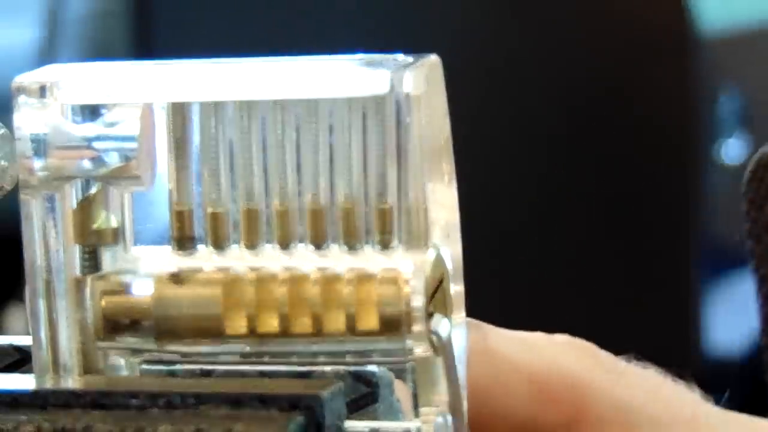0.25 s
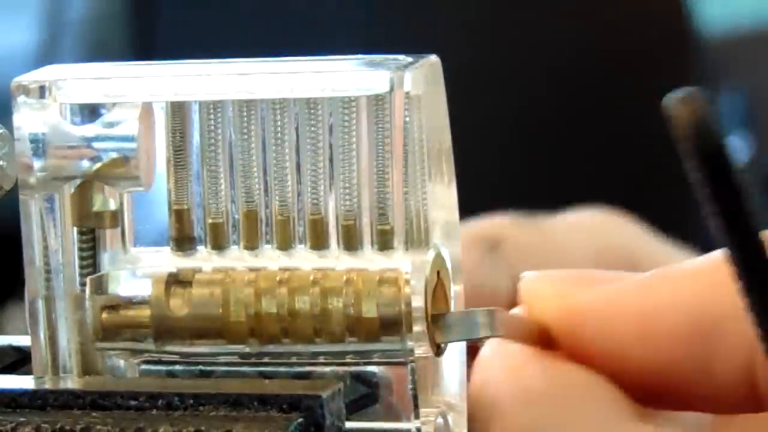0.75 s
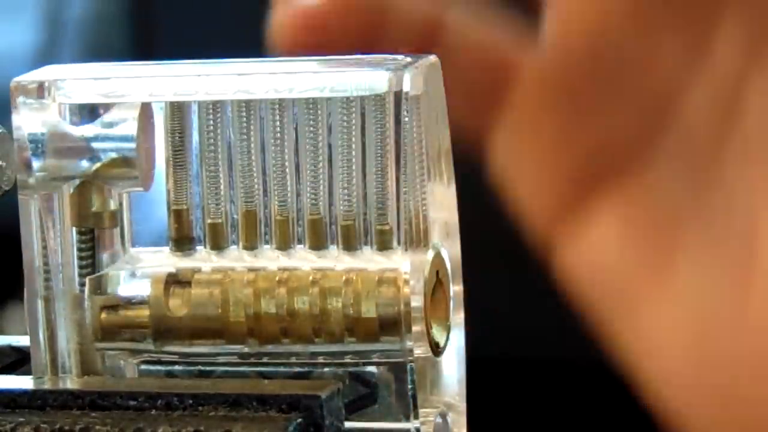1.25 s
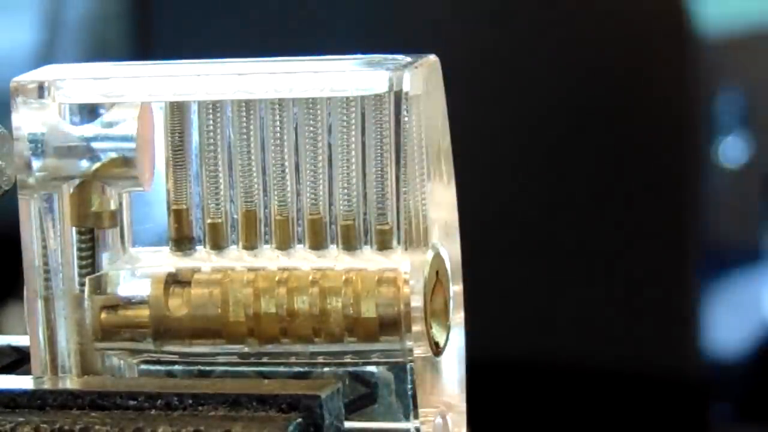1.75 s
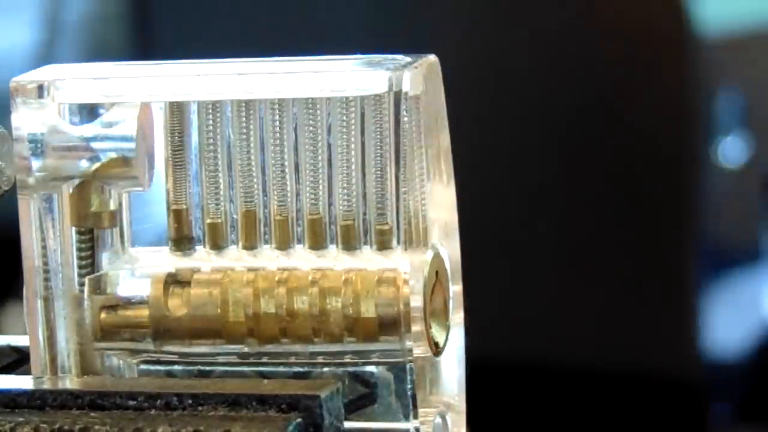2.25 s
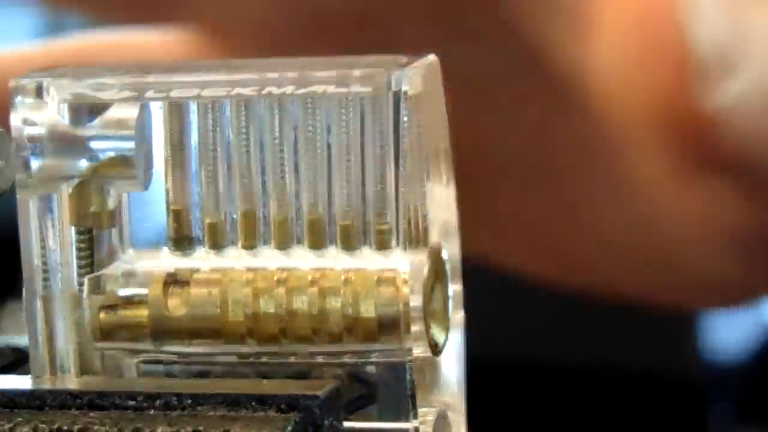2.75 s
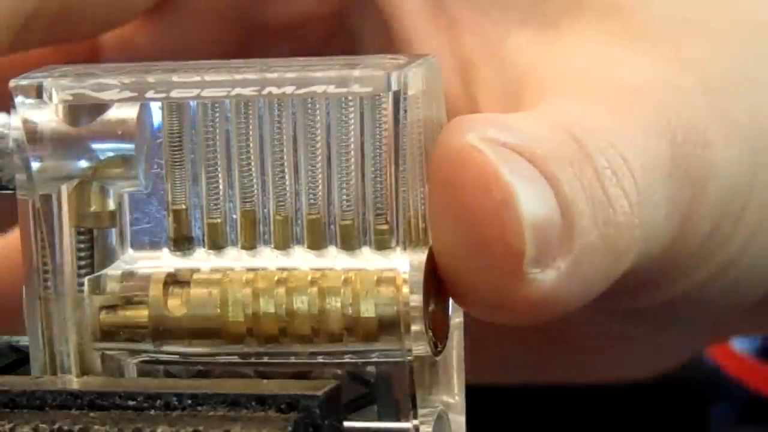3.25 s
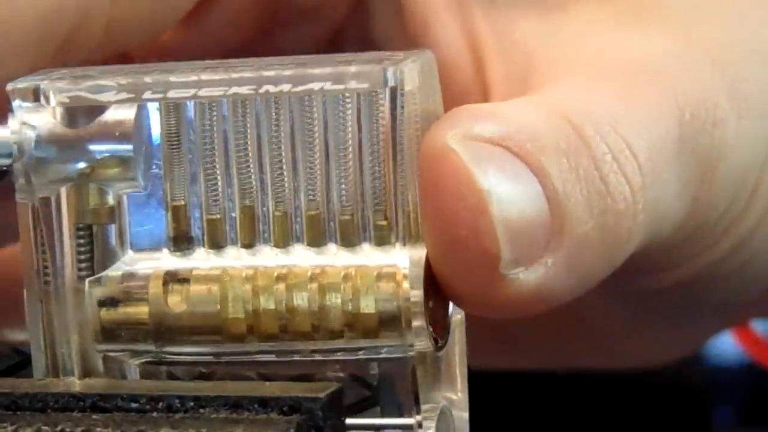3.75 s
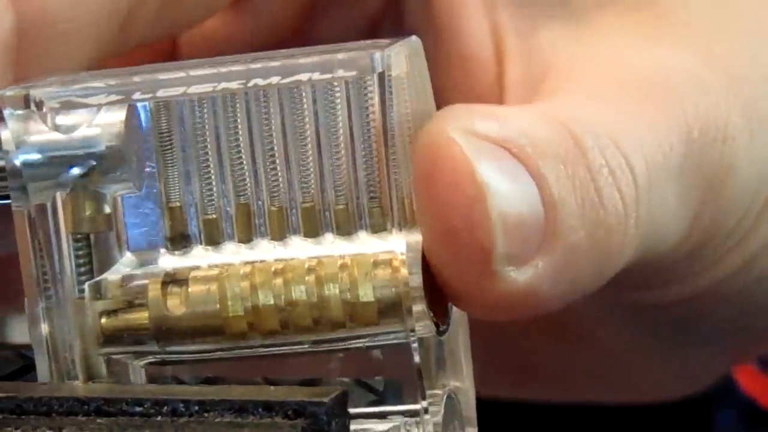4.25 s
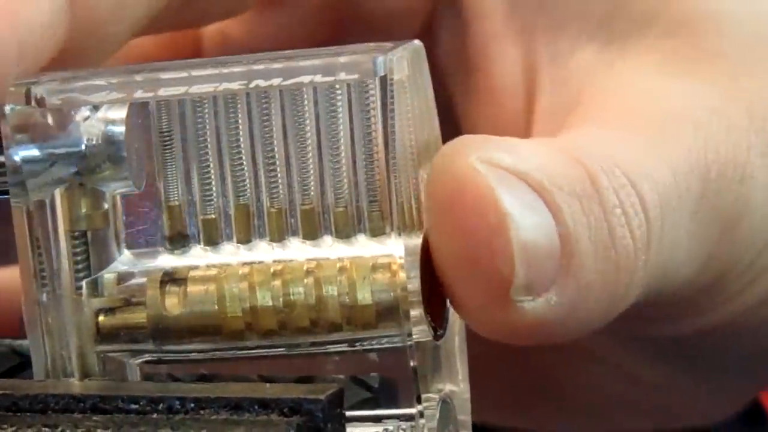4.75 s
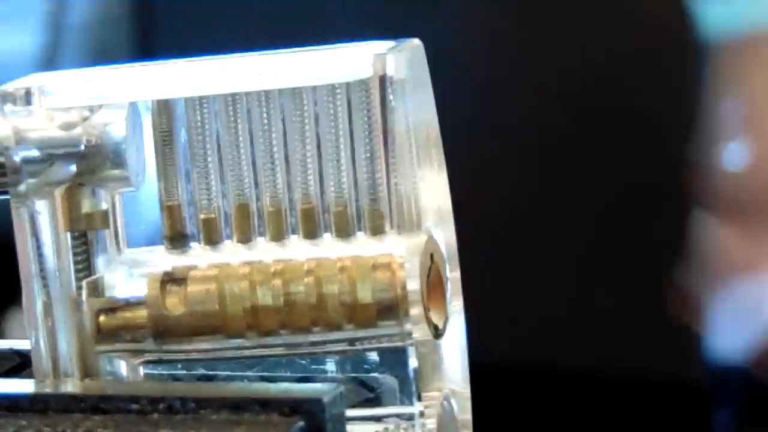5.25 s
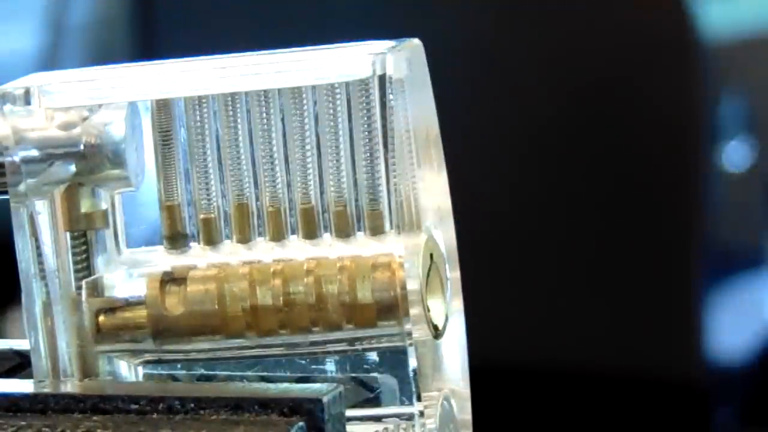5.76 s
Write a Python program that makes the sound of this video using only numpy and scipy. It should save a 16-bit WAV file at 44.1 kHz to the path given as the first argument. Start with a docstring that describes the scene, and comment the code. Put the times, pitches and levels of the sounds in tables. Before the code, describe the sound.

Small metal clicks and tool clinks, then a plastic padlock ticks and snaps shut, close up over faint hum, hiss and motor purr.

```python
"""Padlock snapping shut

A plastic padlock in a vice, close up in a small quiet room. A steel wrench leaves the keyway and
two picking tools are laid on the desk. A hand presses the shackle: it ticks against the bolt, then
snaps shut. Each contact chatters and rings. Behind: hum, hiss and the faint purr of a focus motor."""
import sys
import numpy as np
from scipy import signal
from scipy.fft import rfft, irfft
from scipy.io import wavfile
from scipy.ndimage import uniform_filter1d

SR = 44100
rng = np.random.default_rng(int(sys.argv[2]) if len(sys.argv) > 2 else 0)


def generate_wav(sig):
    """Save sig (samples, or channels by samples) to the path in sys.argv[1] as 16-bit PCM at SR."""
    pcm = np.round(np.clip(np.atleast_2d(sig).T, -1, 1) * 32767).astype(np.int16)
    wavfile.write(sys.argv[1], SR, pcm)


N = 265614

# Room decay. Each row: frequency in Hz, t60 in seconds.
ROOM_T60 = [(250, .36), (700, 0.44), (1740, 0.3), (4600, 0.4), (9000, 0.32), (13000, 0.32)]
# Mains hum. Each row: frequency in Hz, rms level in dB.
HUM_PARTIALS = [(59.8, -68.5), (119.6, -79), (299.8, -65.5)]
# Drone envelope. Each row: time in seconds, rms level in dB.
DRONE_ENVELOPE = [(0, -79), (0.35, -61), (0.95, -66), (1.3, -64), (1.7, -74), (6.02, -88.5)]
# Hiss spectrum. Each row: frequency in Hz, relative density in dB.
HISS_SPECTRUM = [(15, -12), (35, -6), (60, -10), (95, -12), (170, -11.5), (300, -12.5), (450, -14.5),
                 (650, -17), (1200, -17), (1700, -20), (2500, -20.5), (5000, -25), (9000, -28),
                 (14000, -30)]
# Focus searches. Each row: probe start in seconds, sweep start in seconds, first-step peak in dB.
MOTOR_SEARCHES = [(0.199, 0.432, -43.5), (2.431, 2.6336, -44), (5.099, 5.332, -45.5)]
# Hollow motor resonances. Each row: frequency in Hz, width in Hz, gain in dB.
MOTOR_MODES = [(412, 60, 10), (693, 55, 11.5), (1145, 127, 11)]

# Contacts. Each row: start in seconds, level in dB, treble (hardness) in dB, chatter decay in ms.
WRENCH_HITS = [(0.6050, -18.5, 2, 0.64), (0.6072, -15, 3.5, 1.1), (0.6125, -25, 3, 3.8),
               (0.6200, -25, 11, 2.5), (0.6395, -23.5, 0, 2.8), (0.6458, -27, -5.5, 2.6)]
TIP_HITS = [(0.8502, -35.5, 4.5, 0.99), (0.8572, -47, 12, 0.9), (0.8640, -47, 11, 1.2),
            (0.9972, -44, -5, 1.5), (1.0050, -57, -4, 0.9)]
PICK_HITS = [(2.0092, -33, -6.5, 6.6), (2.0135, -27, 5.5, 20), (2.0425, -36, 9, 3), (2.3660, -31.5, 6, 7.8),
             (2.3715, -35.5, 3, 4.6), (2.3762, -24, 13, 5), (2.3820, -32.5, 5, 6.3)]
RAKE_HITS = [(2.2250, -33, -5.5, 1.6), (2.2385, -38, 12, 1.5), (2.2496, -35, -6.5, 11),
             (2.2635, -32, 2.5, 6.3), (2.4328, -31, 10.5, 13), (2.4445, -30.5, 8, 7.7),
             (2.4525, -34.5, 13, 7.1), (2.4770, -40, 12, 3.6)]
BOLT_HITS = [(3.4825, -37, -1, 7.4), (3.7306, -28.5, 0, 3.4), (3.7395, -39, -3, 3),
             (4.1810, -54, -2.5, 1.5), (4.4295, -36, 16, 2.6)]
CATCH_HITS = [(3.9382, -23.5, -1.5, 4.1), (3.9470, -26.5, 16.5, 1.4), (3.9540, -40.5, 14.5, 1.1)]
SHACKLE_HITS = [(4.2259, -2.5, 3.5, 3.6), (4.2305, -8, -8, 1.6), (4.2339, -8, 7, 0.91),
                (4.2411, -17.5, 5.5, 0.9)]

# Ringing modes. Each row: frequency in Hz, relative level in dB, t60 in seconds.
WRENCH_RING = [(1890, -8, 0.023), (2410, -16, 0.027), (3070, -12, 0.021), (3530, -12, 0.014),
               (4300, -5.5, 0.011), (4510, -13, 0.041), (6190, -10, 0.02), (6760, -8.5, 0.021),
               (11200, -11, 0.02), (11400, -13, 0.018), (12600, -1, 0.024), (13900, 8.5, 0.012)]
TIP_RING = [(4581, 0.5, .028), (7600, -4, .025), (8040, -13, .025), (10400, -13, .025), (11190, -10, 0.035),
            (13820, 2, .03)]
PICK_RING = [(3240, -12, 0.06), (4120, -10.5, .05), (6500, -8, 0.046), (8000, -4, 0.068), (8450, -7, 0.047),
             (10900, -6, 0.095), (11030, 0, 0.097), (12660, 0, .055), (13020, -6, .05), (13700, -3, .04)]
RAKE_RING = [(2040, -19, 0.061), (3720, -3.5, 0.042), (4010, -11.5, 0.048), (5310, -10.5, 0.09),
             (7350, 2.5, 0.04), (8140, -9, 0.052), (9730, -2.5, 0.062), (10800, -5, 0.077),
             (12000, 0.5, 0.083), (13020, -12, .05)]
BOLT_RING = [(1310, -6.5, 0.02), (1800, -7, 0.028), (2490, -3.5, 0.047), (3680, 0.5, .025),
             (5670, -2.5, 0.027), (6200, 3.5, 0.025), (6670, -1.5, 0.026), (9320, -1, 0.026),
             (9560, -10.5, .03)]
CATCH_RING = [(1240, -7, 0.015), (1720, -2.5, 0.016), (2720, -6, 0.011), (3306, 0, .024),
              (3563, -5.5, .018), (6200, -2.5, 0.022), (10250, 3.5, 0.0075), (13650, -6.5, .01)]
SHACKLE_RING = [(220, -23, 0.12), (452, -22.5, .09), (1010, -14, 0.037), (1390, -4.5, 0.014),
                (1748, 2, 0.023), (2440, -7.5, 0.033), (3305, -9, 0.045), (3604, -4.5, 0.036),
                (3900, -9.5, .022), (4400, -5.5, .028), (4900, -12.5, .03), (6000, -12.5, 0.046),
                (6090, 1.5, 0.018), (7110, -11.5, .03), (9550, -6, .04), (9660, -4.5, .03),
                (10320, -8.5, .028), (11410, -1.5, .035), (11230, -2, 0.03), (12000, -9.5, .04),
                (12620, -3.5, .028), (13460, -4.5, 0.049)]

# Spectra of the dense, quickly damped modes. Each row: frequency in Hz, relative density in dB.
WRENCH_CHATTER = [(100, -35), (1100, -26), (1800, -1), (4500, -5.5), (5400, -10), (6700, -9), (7600, -13.5),
                  (9500, -7), (12500, -0.5), (14200, 4)]
TIP_CHATTER = [(100, -32), (1800, -11), (3300, -17), (4500, -5), (5600, -7), (8000, -8), (11000, 1),
               (14200, 5)]
TOOL_CHATTER = [(60, -11.5), (220, -3.5), (500, -12.5), (2500, -11), (3700, -5.5), (5700, -6.5),
                (7000, 1.5), (8500, 1.5), (10000, -3), (12800, 5), (14200, -1)]
BOLT_CHATTER = [(60, -9.5), (250, -12), (700, -5.5), (1400, -0.5), (2800, -1), (3300, -10), (3800, 1),
                (4800, -7.5), (6400, 1), (7400, -14.5), (9500, -11), (12000, -18), (14200, -16)]
SHACKLE_CHATTER = [(40, -2.5), (120, -4.5), (350, -6), (700, -11), (1100, -4), (1600, -3), (3200, -1),
                   (4900, -2.5), (6300, -3.5), (7300, -5), (8700, 0), (11000, 0.5), (14200, -3.5)]


def amp(db):
    """dB to gain."""
    return 10 ** (np.asarray(db) / 20)


def unit_energy(x):
    """Scale to energy 1."""
    return x / np.sqrt(np.sum(x ** 2) + 1e-20)


def lookup(points, hz):
    """Interpolate on a log-frequency axis."""
    points_hz, values = np.transpose(points)
    return np.interp(np.log(hz + 1), np.log(points_hz + 1), values)


def add(mix, start_s, sound):
    """Mix in place from start_s."""
    part = mix[round(start_s * SR):][:len(sound)]
    part += sound[:len(part)]


def colour(x, points):
    """Minimum-phase filter through (Hz, dB) points."""
    size = 2 * len(x)
    hz = abs(np.fft.fftfreq(size, 1 / SR))
    log_gain = np.log(amp(lookup(points, hz)))
    response = np.exp(np.conj(signal.hilbert(log_gain)))
    return np.fft.ifft(np.fft.fft(x, size) * response).real[:len(x)]


def low_pass(x, hz):
    """Steep FIR low-pass."""
    return signal.oaconvolve(x, signal.firwin(401, hz, window=("kaiser", 8), fs=SR), "same")


def drift(top_hz):
    """Slow random wander, standard deviation 1."""
    rates_hz = np.geomspace(top_hz / 10, top_hz, 12)[:, None]
    t = np.arange(N) / SR
    wander = np.sin(2 * np.pi * (rates_hz * t[::256] + rng.random(rates_hz.shape))).sum(0)
    return np.interp(t, t[::256], wander / wander.std())


def room_echo(sound, gap_s=0.0077, build_s=0.022):
    """Diffuse echo at the input's energy: builds after a gap, decays per band."""
    hz, t, spectra = signal.stft(rng.standard_normal(SR // 2), SR, nperseg=256)
    tail = signal.istft(spectra * amp(-60 * t / lookup(ROOM_T60, hz)[:, None]), SR)[1]
    tail *= np.clip((np.arange(len(tail)) / SR - gap_s) / build_s, 0, 1)
    return unit_energy(signal.fftconvolve(sound, tail)) * np.linalg.norm(sound)


def room_tone(waver_db=0.75, drone_hz=66.8, hiss_rms_db=-57):
    """Wavering mains hum, a low drone that swells and fades, steady hiss."""
    t = np.arange(N) / SR
    hum = sum(amp(db - waver_db * drift(top_hz=12)) * np.sin(2 * np.pi * (hz * t + rng.random()))
              for hz, db in HUM_PARTIALS)
    drone = amp(np.interp(t, *np.transpose(DRONE_ENVELOPE))) * np.sin(2 * np.pi * drone_hz * t)
    hiss_gain = amp(lookup(HISS_SPECTRUM, np.fft.rfftfreq(N, 1 / SR)))
    hiss = irfft(rfft(rng.standard_normal(N)) * hiss_gain, N)
    return np.sqrt(2) * (hum + drone) + amp(hiss_rms_db) * np.sqrt(N) * unit_energy(hiss)


def motor_steps(start_s, db, fade_db_per_s, count, steps_per_s=30):
    """Even, fading run of steps as (start s, peak dB)."""
    return [(start_s + s, db - fade_db_per_s * s) for s in np.arange(count) / steps_per_s]


def focus_search(probe_s, sweep_s, db, settle_s=0.043, settle_db=-1.5):
    """Short probe, long sweep, one late settling step."""
    probe = motor_steps(probe_s, db, fade_db_per_s=33, count=5)
    sweep = motor_steps(sweep_s, db, fade_db_per_s=3.5, count=11)
    return probe + sweep + [(sweep[-1][0] + settle_s, db + settle_db)]


def focus_motor(top_hz=1400, bottom_hz=330, chirp_s=0.00682, room_db=-11):
    """Soft purr: each step is a falling chirp with a hollow ring."""
    out, t = np.zeros(N), np.arange(SR // 16) / SR
    progress = np.minimum(t / chirp_s, 1)
    cycles = np.cumsum(top_hz * (bottom_hz / top_hz) ** progress) / SR
    for search in MOTOR_SEARCHES:
        for start_s, db in focus_search(*search):
            chirp = np.sin(2 * np.pi * (cycles + rng.random())) * np.sin(np.pi * progress) ** 0.5
            hollow = sum(amp(gain_db) * signal.lfilter(*signal.iirpeak(hz, hz / width_hz, fs=SR), chirp)
                         for hz, width_hz, gain_db in MOTOR_MODES)
            pulse = chirp + hollow
            jitter_s = rng.uniform(-0.00219, 0.002)
            add(out, start_s + jitter_s, amp(db) * pulse / abs(pulse).max())
    return out + amp(room_db) * room_echo(out)[:N]


def ring(modes, t, spread_db=1.5):
    """Decaying sines; each contact point excites them differently."""
    hz, db, t60_s = np.transpose(modes)[:, :, None]
    db = db + spread_db * rng.standard_normal(hz.shape)
    sines = np.sin(2 * np.pi * (hz * t + rng.random(hz.shape)))
    return unit_energy(np.sum(amp(db - 60 * t / t60_s) * sines, 0))


def strikes(hits, modes, spectrum, near_ring_db, far_ring_db, rise_ms, room_db):
    """Metal contacts: brief chatter plus ringing; harder contacts are brighter."""
    out, t = np.zeros(N), np.arange(6000) / SR
    t_ms = 1000 * t
    for start_s, db, treble_db, chatter_ms in hits:
        burst = rng.standard_normal(len(t)) * np.exp(-t_ms / chatter_ms)
        chatter = unit_energy(colour(burst, spectrum))
        ringing = ring(modes, t)
        attack = 1 - np.exp(-t_ms / rise_ms)
        hardness = [(5000, 0), (11000, treble_db)]
        # direct path and room each get their own share of ringing
        near, far = (unit_energy(colour((chatter + amp(ring_db) * ringing) * attack, hardness))
                     for ring_db in (near_ring_db, far_ring_db))
        gain = amp(db) * np.sqrt(0.004 * SR)  # db is the rms of the energy spread over 4 ms
        add(out, start_s, gain * near)
        add(out, start_s, gain * amp(room_db) * room_echo(far))
    return out


def wrench():
    """Steel wrench rattles out of the keyway; its tip then ticks twice."""
    pull = strikes(WRENCH_HITS, WRENCH_RING, WRENCH_CHATTER,
                   near_ring_db=-3, far_ring_db=-11, rise_ms=0.39, room_db=-11)
    tip = strikes(TIP_HITS, TIP_RING, TIP_CHATTER,
                  near_ring_db=-8.5, far_ring_db=-14, rise_ms=0.17, room_db=-13)
    return pull + tip


def picking_tools():
    """Pick and rake clink onto the desk."""
    pick = strikes(PICK_HITS, PICK_RING, TOOL_CHATTER,
                   near_ring_db=-2.5, far_ring_db=2, rise_ms=1.0, room_db=-9)
    rake = strikes(RAKE_HITS, RAKE_RING, TOOL_CHATTER,
                   near_ring_db=-2, far_ring_db=-8, rise_ms=0.33, room_db=-6)
    return pick + rake


def padlock():
    """Under hand pressure the bolt slips, the catch jumps and the shackle snaps home."""
    bolt = strikes(BOLT_HITS, BOLT_RING, BOLT_CHATTER,
                   near_ring_db=-0.5, far_ring_db=-2, rise_ms=0.5, room_db=-12)
    catch = strikes(CATCH_HITS, CATCH_RING, SHACKLE_CHATTER,
                    near_ring_db=0.5, far_ring_db=0.5, rise_ms=0.15, room_db=-12)
    shackle = strikes(SHACKLE_HITS, SHACKLE_RING, SHACKLE_CHATTER,
                      near_ring_db=-0.5, far_ring_db=-5, rise_ms=0.45, room_db=-11)
    return bolt + catch + shackle


def scene():
    """Mono mix: wrench out, tools down, lock shut, over motor and room tone."""
    return (wrench() + picking_tools() + padlock() + focus_motor() + room_tone())[None]


def record(dry, threshold_db=-19, cut_db_per_db=0.4, attack_s=0.022, recover_db_per_s=5.5):
    """Microphone roll-off; the snap overloads it and ducks the gain, which creeps back."""
    mic = low_pass(dry[0], hz=14250)
    power_db = 10 * np.log10(abs(uniform_filter1d(mic ** 2, size=300)) + 1e-12)
    over_db = np.maximum(power_db - threshold_db, 0)
    recovery_db = recover_db_per_s * np.arange(N) / SR
    cut_db = np.maximum.accumulate(cut_db_per_db * over_db + recovery_db) - recovery_db
    pole = np.exp(-1 / (attack_s * SR))
    ducked = mic * amp(-signal.lfilter([1 - pole], [1, -pole], cut_db))
    return low_pass(np.clip(ducked, -1, 1), hz=15200)[None]


dry = scene()
out = record(dry)
generate_wav(out)
```